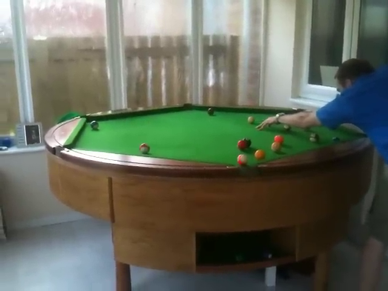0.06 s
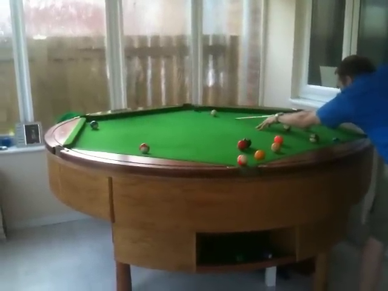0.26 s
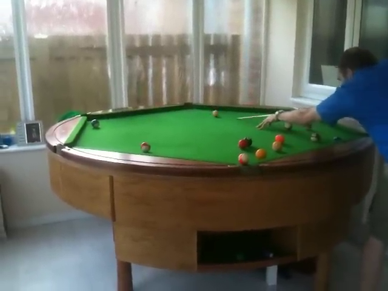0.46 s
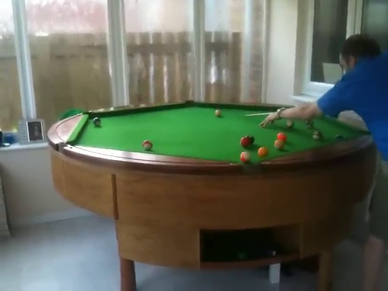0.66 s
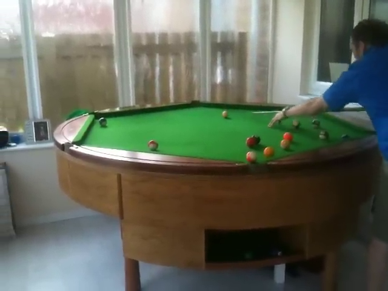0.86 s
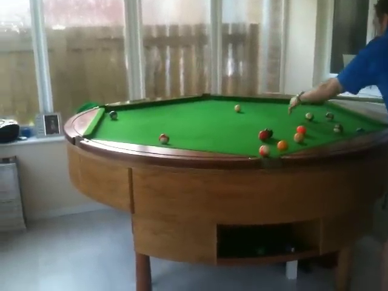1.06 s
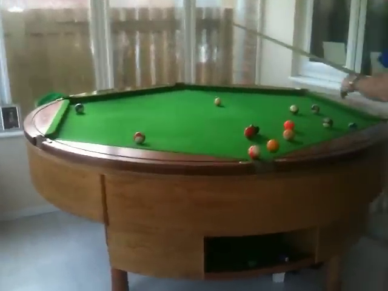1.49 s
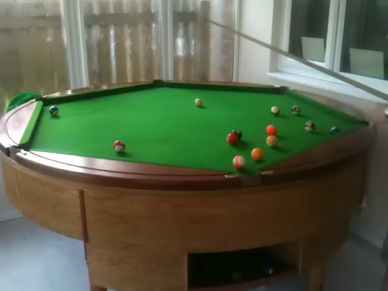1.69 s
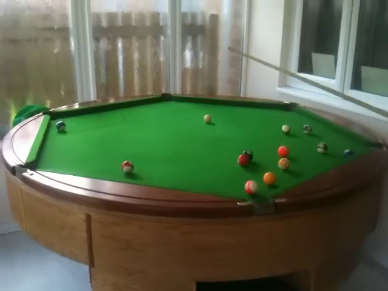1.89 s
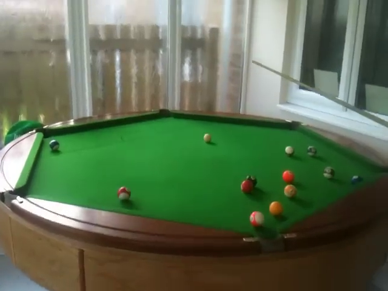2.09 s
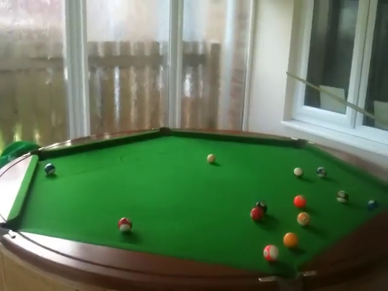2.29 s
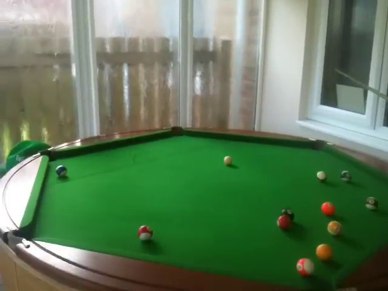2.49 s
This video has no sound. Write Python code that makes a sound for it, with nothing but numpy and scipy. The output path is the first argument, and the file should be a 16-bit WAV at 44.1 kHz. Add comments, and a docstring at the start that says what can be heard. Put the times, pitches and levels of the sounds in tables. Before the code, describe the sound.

Pool balls clack loudly at 0.3 seconds, just after the dry snap of a cue. From 0.4 to about 1 second they bang off the cushions and rumble over the hollow wooden table. A lighter clack comes at 1.6 seconds, then a soft swish of cloth around 2 seconds. Soft knocks and rolling continue until about 2.5 seconds, with short echoes from a small, quiet room.

```python
"""A sharp clack of pool balls just after the snap of the cue, in a small, hard-walled room.
A ball bangs round the cushions and rumbles over the hollow wooden table; later come a lighter
clack, a swish of cloth and soft knocks as the balls run out. Each clack is a tiny contact pulse
with echoes, each knock rattles and rings rail and cabinet, and roll and swish are shaped noise."""
import sys
import numpy as np
from scipy import signal
from scipy.fft import rfft, irfft
from scipy.io import wavfile

SR = 44100
rng = np.random.default_rng(int(sys.argv[2]) if len(sys.argv) > 2 else 0)


def inscribe(sig):
    """Save sig as 16-bit PCM at rate SR to the path in sys.argv[1].

    A 1-D sig is mono; a 2-D sig holds one channel per row.
    Samples are clipped to [-1, 1] before scaling.
    """
    pcm = np.round(np.clip(np.atleast_2d(sig).T, -1, 1) * 32767)
    wavfile.write(sys.argv[1], SR, pcm.astype(np.int16))


N = 116865
T = np.arange(N) / SR
AGE = T[:SR]  # the first second of a struck sound
CUE_S = .2015

# resonances of the hollow table: f/Hz, level/dB, t60/s
TABLE_MODES = [(143.6, -28.5, 0.35), (229.7, -26.5, 0.77), (306.7, -2.5, 0.38), (371.6, -10.5, 0.57),
               (424, -3, 0.32), (483.6, -8.5, 0.33), (577.7, -11, 0.26), (650, -13.5, 0.19)]
# low-mid body of a blow on the table: f/Hz, level/dB
BODY_COLOUR = [(100, -57.5), (230, -5), (310, -13), (430, 1.5), (620, -2), (800, -14), (1300, -33),
               (3000, -57.5)]


def from_db(db):
    """Decibels to gain."""
    return 10 ** (np.asarray(db) / 20)


def rms_one(x):
    """Scale to rms 1."""
    return x / np.sqrt(np.mean(x ** 2) + 1e-20)


def dying(t60):
    """One second of exponential decay, falling 60 dB in t60 seconds."""
    return from_db(-60 * AGE / t60)


def rising(seconds):
    """Smooth attack with the given time constant."""
    return 1 - np.exp(-AGE / seconds)


def add(out, s, sound):
    """Mix a sound in at s seconds."""
    i = int(s * SR)
    out[i:i + len(sound)] += sound[:N - i]


def coloured(x, points, size=8192):
    """Minimum-phase EQ of unit energy: the (f/Hz, level/dB) points set only its shape."""
    hz, db = np.transpose(points)
    log_hz = np.log(np.fft.rfftfreq(size, 1 / SR) + 1)
    log_gain = np.log(from_db(np.interp(log_hz, np.log(hz), db)))
    cepstrum = irfft(log_gain)[:size // 2]
    cepstrum[1:] *= 2
    pulse = irfft(np.exp(rfft(cepstrum, size)))
    return signal.fftconvolve(x, pulse / np.linalg.norm(pulse))[:len(x)]


def even_noise():
    """White noise with its deepest gaps in time and pitch evened out, like densely packed echoes."""
    bins = signal.stft(rng.standard_normal(SR), nperseg=1024)[2]
    evened = bins / np.sqrt(abs(bins) + 1e-9)
    return rms_one(signal.istft(evened, nperseg=1024)[1][:SR])


def ringing(modes, spread_db=3.0, damped_above_hz=800, damped_t60=.33):
    """Struck modes whose strengths vary from blow to blow; the high ones have their t60 capped."""
    out = 0
    for k, (hz, db, t60) in enumerate(modes):
        decay = dying(min(t60, damped_t60) if hz > damped_above_hz else t60)
        strength = from_db(db + spread_db * rng.normal())
        out = out + strength * (-1) ** k * np.sin(2 * np.pi * hz * AGE) * decay
    return out


def reverberation():
    """Dense echoes, each range of pitch dying at its own rate."""
    # ringing time of room and table: f/Hz, t60/s
    decay_times = [(60, 0.2), (200, 0.53), (500, 0.3), (1200, 0.4), (2800, 0.28), (6000, 0.34),
                   (14000, 0.24)]
    hz, t60s = np.transpose(decay_times)
    spectrum = rfft(even_noise())
    log_hz = np.log(np.arange(SR // 2 + 1) + 1)
    tail = 0
    for share, t60 in zip(np.eye(len(hz)), t60s):
        band = irfft(spectrum * np.interp(log_hz, np.log(hz), share), SR)
        tail = tail + band * dying(t60)
    return tail


def early_echoes(scatter_db=-20, scatter_s=.015):
    """Distinct reflections in a short cloud of scatter from the nearby wood."""
    # echoes off table, wall and ceiling: delay/s, gain
    echoes = [(.003, 0.6), (.005, 1), (.007, .7), (.0086, .5), (.0106, .5), (.0136, .45), (.0157, .4)]
    path = from_db(scatter_db) * even_noise() * np.exp(-(AGE / scatter_s) ** 4) * rising(.001)
    for delay, gain in echoes:
        path[int(delay * SR)] += gain
    return path


def low_cut(x, low_cut_hz=103):
    """The deepest bass is cut away."""
    return signal.sosfilt(signal.butter(6, low_cut_hz, "high", fs=SR, output="sos"), x)


def room_tone(level_db=-67):
    """The faint, dark hush of the room."""
    # spectrum of the hush: f/Hz, level/dB
    colour = [(25, -37.5), (70, -26.5), (170, 3.5), (330, -4.5), (700, -7.5), (2000, -19.5), (6000, -24),
              (16000, -31)]
    return from_db(level_db) * coloured(rng.standard_normal(N), colour)


def swish():
    """Soft, bright friction: the cue slides through the hand, later cloth moves and catches."""
    # friction envelope: t/s, level/dB
    envelope = [(.12, -81), (.14, -68), (1.2, -64.5), (1.26, -63.5), (1.64, -67.5), (1.68, -55),
                (1.76, -61), (1.8, -51), (1.85, -52.5), (1.93, -45), (2.0, -49.5), (2.1, -51), (2.18, -64),
                (2.57, -74.5), (2.6, -66.5)]
    # faint ticks of the moving cloth: t/s, level/dB
    ticks = [(1.248, -35), (1.299, -36), (1.42, -35.5), (1.553, -35), (2.584, -35)]
    # friction spectrum: f/Hz, level/dB
    colour = [(300, -40.5), (1000, -13), (1800, -3.5), (2500, -10.5), (3300, -1.5), (4100, -9), (5200, -5),
              (7000, -5.5), (10000, -10), (16000, -19)]
    friction = from_db(np.interp(T, *np.transpose(envelope))) * rng.standard_normal(N)
    for s, db in ticks:
        add(friction, s, [from_db(db)])
    return coloured(friction, colour)


def rolling(ring_db=-4):
    """Balls running over the cloth shake the bed and the modes of the table."""
    # weight of the rolling balls: t/s, level/dB
    envelope = [(.2, -48.5), (.3, -47), (.55, -47.5), (.75, -34.5), (.88, -27.5), (1.03, -29),
                (1.12, -44.5), (1.28, -56.5), (1.42, -52.5), (1.54, -46.5), (1.7, -51), (1.82, -50),
                (2.05, -50), (2.17, -40.5), (2.36, -28.5), (2.45, -45), (2.57, -48.5), (2.65, -52.5)]
    # rumble of the bed: f/Hz, level/dB
    colour = [(40, -59), (75, -38.5), (100, -14), (165, -11), (210, 5.5), (310, 3.5), (420, -3.5),
              (600, -19), (800, -28), (1600, -22.5), (3000, -29.5), (8000, -60)]
    rumble = coloured(rng.standard_normal(N), colour)
    ring = rms_one(signal.fftconvolve(rng.standard_normal(N), ringing(TABLE_MODES))[:N])
    weight = (T > CUE_S) * from_db(np.interp(T, *np.transpose(envelope)))
    return low_cut(weight * rms_one(rumble + from_db(ring_db) * ring))


def cue(snap_db=-18.5, room_db=-9):
    """The tip strikes with a dry snap, the shaft rings and the room answers."""
    # snap of the tip: f/Hz, level/dB
    colour = [(60, -35), (200, -10.5), (500, -0.5), (1000, -2.5), (1800, 2.5), (2500, -15.5), (3300, -3),
              (4100, -10), (5400, -7), (7500, -22), (10000, -30), (16000, -50)]
    # ring of the shaft: f/Hz, level/dB, t60/s
    shaft_modes = [(1540, -33, .22), (1790, -36, 0.37), (1940, -33.5, 1), (3580, -37, .16)]
    burst = even_noise() * dying(t60=.13) + from_db(room_db) * reverberation()
    snap = from_db(snap_db) * coloured(burst, colour)
    out = np.zeros(N)
    add(out, CUE_S, (snap + ringing(shaft_modes)) * rising(.0045))
    return out


def rattling(spread_db=3.5):
    """A quickly dying run of tiny, uneven contacts."""
    noise = rng.standard_normal(SR)
    grain_db = spread_db * np.repeat(rng.standard_normal(SR), SR // 2000)[:SR]  # half-millisecond grains
    return rms_one(noise * from_db(grain_db)) * dying(t60=.1)


def knocks(thud_hz=35, thud_under_crack_db=14):
    """A ball hits the cushion: the rail cracks and rings, the cabinet booms and the room answers."""
    # cushion and rail hits: t/s, attack/s, boom/dB, body/dB, wood/dB, crack/dB, rail ring/dB, rail
    hits = [(0.3996, 0.0014, -24.5, -25.5, -22, -23.5, -34, "far"),
            (0.433, 0.0019, -24, -30.5, -24.5, -59, -18.5, "far"),
            (0.6097, 0.006, -26, -15.5, -18.5, -26.5, -25, "far"),
            (.679, 0.0037, -36, -24.5, -31.5, -38.5, -29.5, "far"),
            (.712, 0.0021, -51, -32, -48, -64, -55, "far"),
            (0.7996, 0.01, -24.5, -14.5, -21, -25, -39, "far"),
            (.902, 0.0032, -33, -23, -29, -37.5, -64, "far"),
            (.955, 0.0048, -38, -28, -72, -65.5, -55, "far"),
            (1.325, 0.0011, -70, -62.5, -58.5, -63.5, -66, "far"),
            (1.476, 0.00071, -53, -49, -61, -65, -68, "far"),
            (1.775, 0.0068, -43, -53, -55, -60, -61, "near"),
            (1.899, 0.005, -41.5, -47.5, -53, -79, -44, "near"),
            (2.195, 0.006, -43.5, -43, -44.5, -65, -38.5, "near"),
            (2.234, 0.002, -41, -49, -46, -69, -38, "near"),
            (2.301, 0.0025, -35, -42, -35, -47.5, -32.5, "near"),
            (2.461, 0.0019, -39.5, -50, -54, -90, -68, "near")]
    # bass boom, woody middle and bright crack of a knock: f/Hz, level/dB
    boom = [(25, -44), (72, -53), (100, -27), (135, -9), (168, -17.5), (230, 0.5), (300, -4), (450, -12.5),
            (900, -70.5)]
    wood = [(300, 0.5), (650, -2.5), (980, -5), (1250, -4.5), (1600, -3.5), (2100, -10), (2800, -16.5),
            (5000, -18), (16000, -114)]
    crack = [(500, -43), (1800, 5), (3100, 6), (4000, -0.5), (5400, 7), (6600, 0.5), (7700, 0),
             (9000, -6.5), (11000, -14), (12500, -25), (16000, -31)]
    # ring of the far and near wooden rails: f/Hz, level/dB, t60/s
    rail_modes = {"far": [(942, 2.5, 0.078), (1049, -3, 0.18), (1243, 0, 0.067), (1620, -8, 0.18),
                  (1680, -11, 0.13)], "near": [(143.4, -8, 0.8), (239.8, 4, 0.52), (431.2, 6.5, 0.26),
                  (603, -4, 0.38), (645, -10.5, 0.25), (1135, -10.5, 0.36), (1230, -15, 0.31),
                  (1516, -16, 0.36), (1613, -11.5, 0.61), (1630, -22, 0.42)]}
    out, thuds = np.zeros(N), np.zeros(N)
    thud = np.sin(2 * np.pi * thud_hz * AGE) * dying(t60=.036)  # a brief deep pulse under each hard knock
    for s, attack_s, boom_db, body_db, wood_db, crack_db, rail_db, rail in hits:
        attack = rising(attack_s)
        table_ring = from_db(body_db) * ringing(TABLE_MODES)
        rail_ring = from_db(rail_db) * ringing(rail_modes[rail])
        knock = attack * (table_ring + rail_ring)
        for db, colour in ((boom_db, boom), (body_db, BODY_COLOUR), (wood_db, wood), (crack_db, crack)):
            blow = attack * (reverberation() + rattling()) + early_echoes()
            blow[0] += 1  # first touch
            knock += from_db(db) * coloured(blow, colour)
        add(out, s, knock)
        add(thuds, s, from_db(crack_db - thud_under_crack_db) * thud * attack)
    return low_cut(out) + thuds


def clacks(bloom_s=.0066):
    """Ball on ball: one very short pulse, its early echoes and the room; the bed thumps under it."""
    # collisions: t/s, level/dB, glancing share 0-1, early echoes/dB, room/dB, bed thump/dB
    collisions = [(0.2996, 8, 0.06, -2.5, -25, -47), (1.5752, -4.5, 0.75, -12, -28, -40),
                  (2.582, -35, 1, -9.5, -32.5, -77)]
    # tone of a full and of a glancing contact: f/Hz, level/dB
    full_colour = [(100, -48.5), (650, -25), (1300, -3.5), (2050, 0.5), (2400, -3.5), (3050, 3.5),
                   (3600, -2.5), (4200, -11), (5300, -9.5), (7000, -31), (9500, -35.5), (16000, -51.5)]
    glance_colour = [(100, -25.5), (500, -12), (1000, 0.5), (1700, -4.5), (2700, -8), (3200, 3.5),
                     (3800, -7.5), (4800, -3), (7000, -12.5), (9000, -30.5), (16000, -42.5)]
    # lingering ring of a full contact, brief ping of a glancing one: f/Hz, level/dB, t60/s
    full_modes = [(1770, -40, 0.27), (2110, -29.5, 0.13), (2158, -31, 0.21), (2426, -37.5, 0.24),
                  (2600, -39, 0.79), (2860, -35.5, .33), (3100, -35, 0.27), (3370, -38, .3),
                  (3630, -44, 0.9)]
    glance_modes = [(3130, -16, 0.019), (3410, -17.5, 0.02), (4970, -21, .012), (1706, -23, 0.012)]
    out = np.zeros(N)
    bloom = rising(bloom_s)
    for s, db, glancing, echo_db, room_db, thump_db in collisions:
        path = from_db(echo_db) * early_echoes() + from_db(room_db) * reverberation() * bloom
        path[0] += 1  # direct pulse
        full = coloured(path, full_colour) + ringing(full_modes) * bloom
        glance = coloured(path, glance_colour) * rising(.00067) + ringing(glance_modes) * rising(.00058)
        clack = from_db(db) * ((1 - glancing) * full + glancing * glance)
        thump = from_db(thump_db) * coloured(reverberation(), BODY_COLOUR)
        add(out, s, clack + thump)
    return out


def scene():
    """One pool shot over the quiet of the room, in mono."""
    return (cue() + clacks() + knocks() + rolling() + swish() + room_tone())[None]


def record(dry, lopsided=.023, cutoff_hz=15750):
    """The microphone rounds the peaks, one side of the wave a little more; the very top is cut."""
    rounded = np.tanh(dry)
    low_pass = signal.firwin(801, cutoff_hz, fs=SR)
    return signal.fftconvolve(rounded + lopsided * rounded ** 2, low_pass[None], "same", axes=1)


dry = scene()
out = record(dry)
inscribe(out)
```